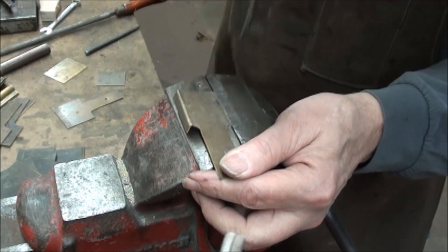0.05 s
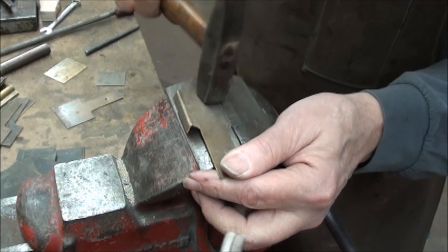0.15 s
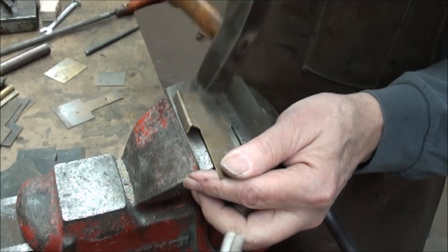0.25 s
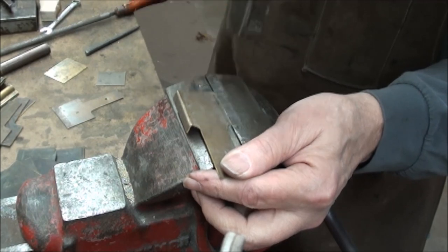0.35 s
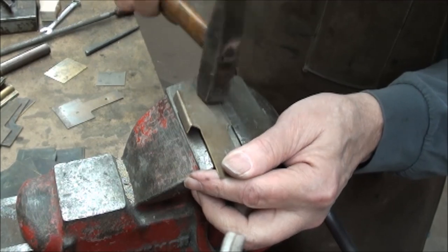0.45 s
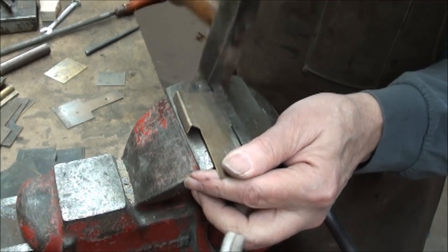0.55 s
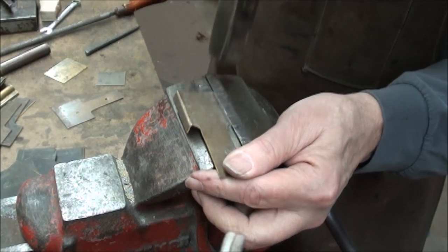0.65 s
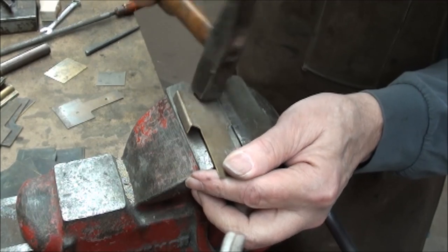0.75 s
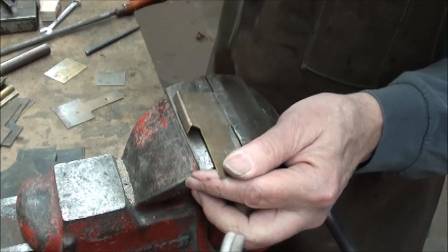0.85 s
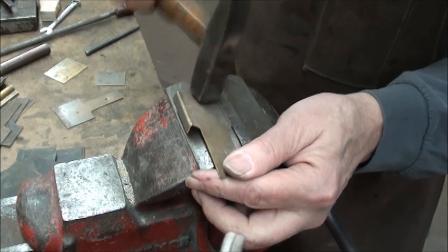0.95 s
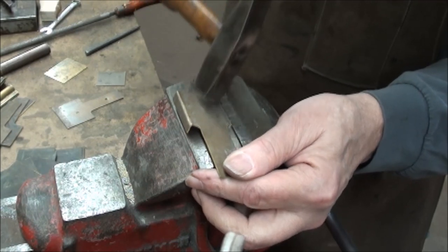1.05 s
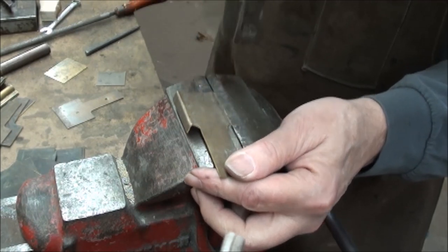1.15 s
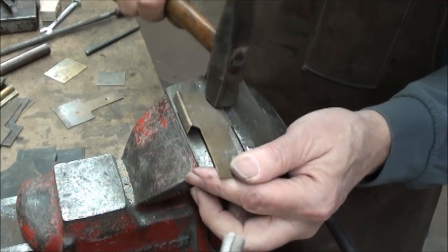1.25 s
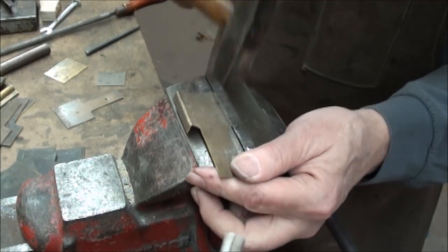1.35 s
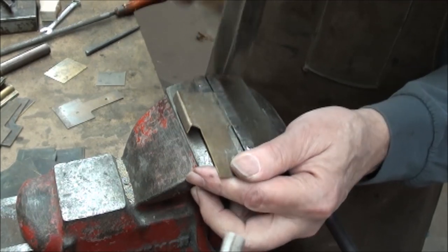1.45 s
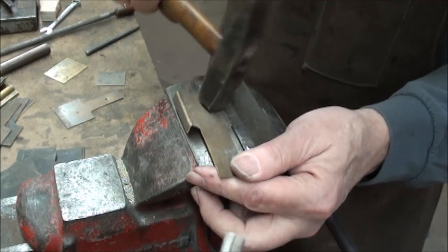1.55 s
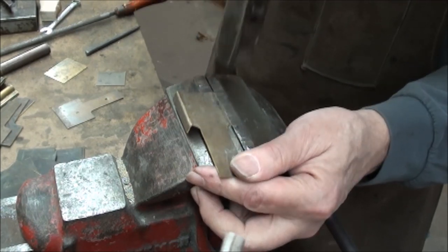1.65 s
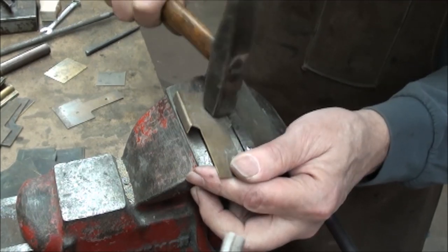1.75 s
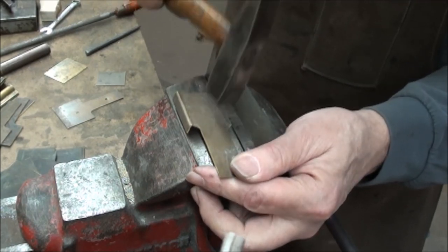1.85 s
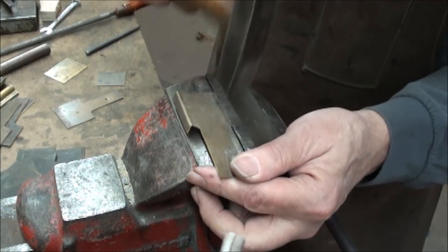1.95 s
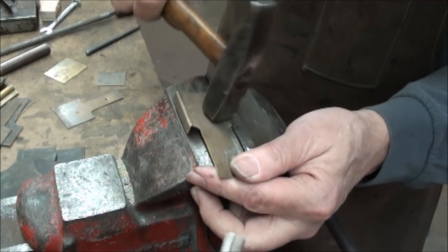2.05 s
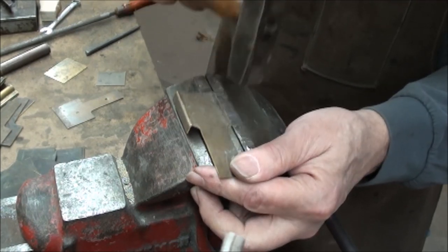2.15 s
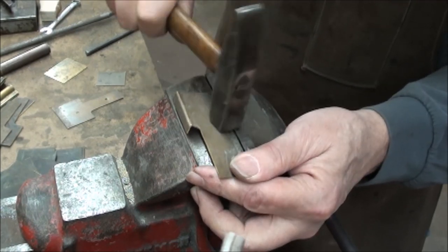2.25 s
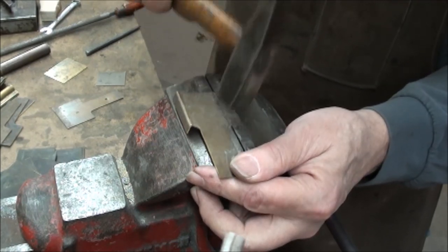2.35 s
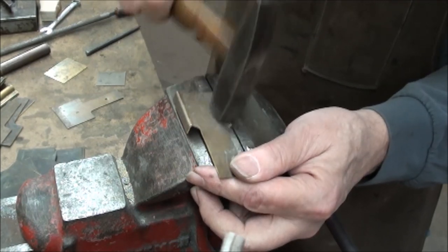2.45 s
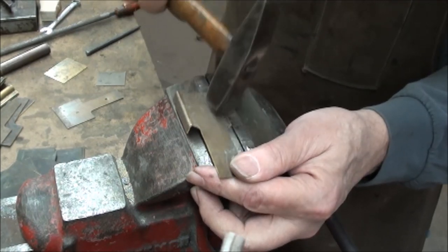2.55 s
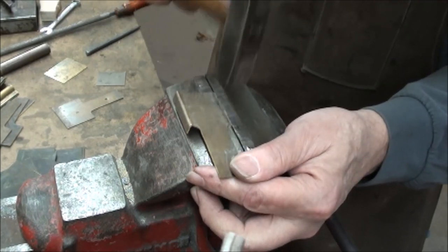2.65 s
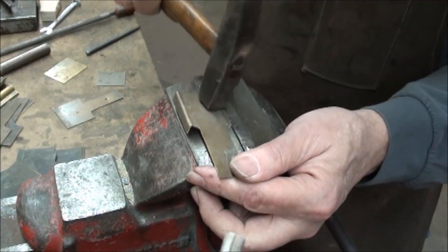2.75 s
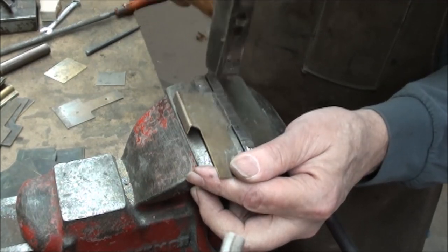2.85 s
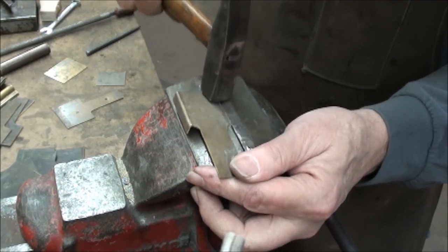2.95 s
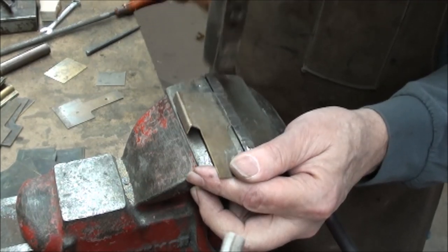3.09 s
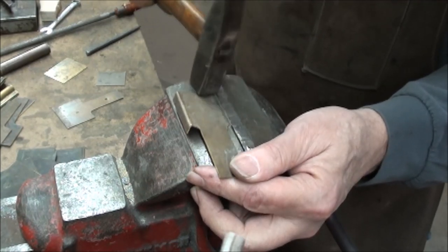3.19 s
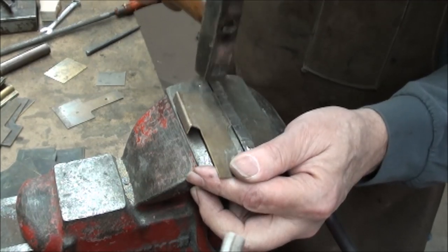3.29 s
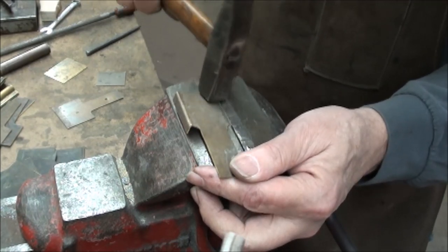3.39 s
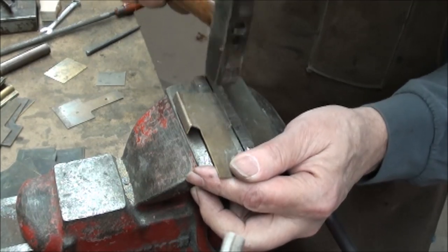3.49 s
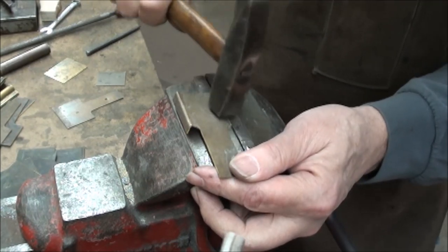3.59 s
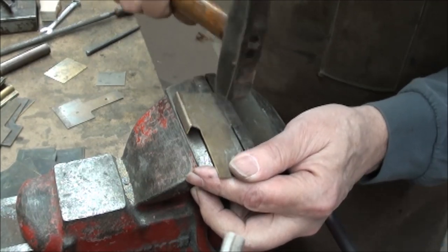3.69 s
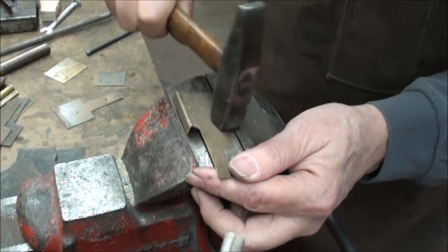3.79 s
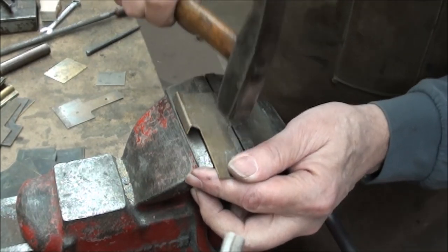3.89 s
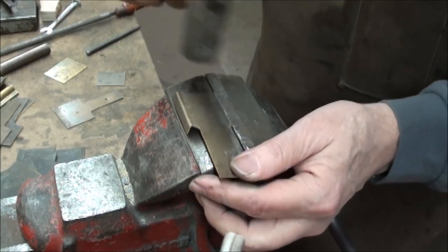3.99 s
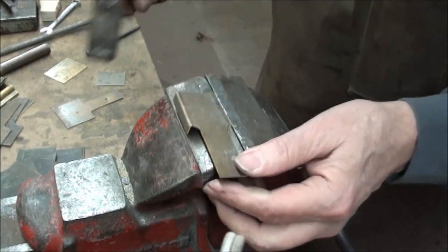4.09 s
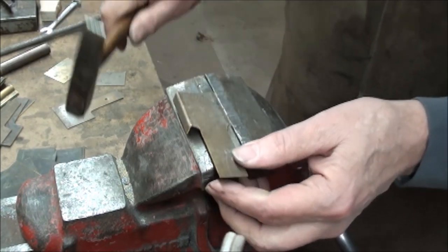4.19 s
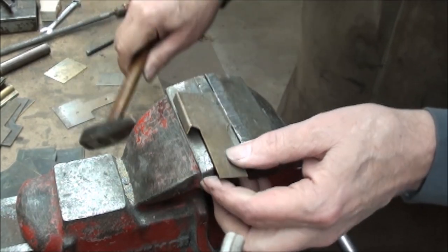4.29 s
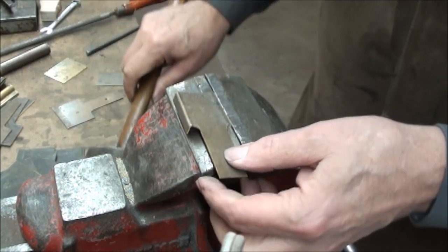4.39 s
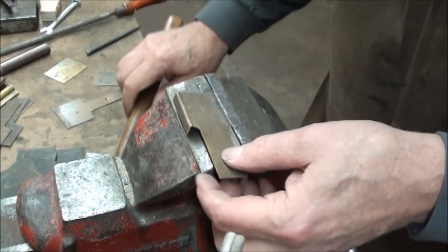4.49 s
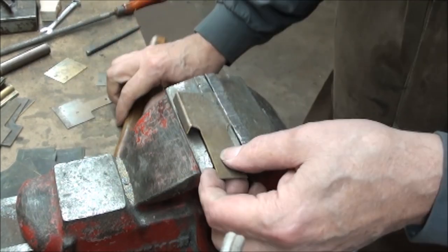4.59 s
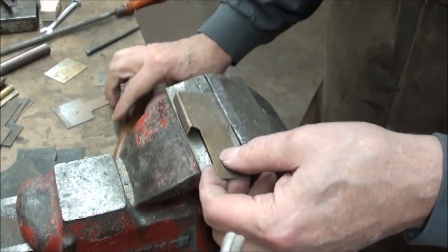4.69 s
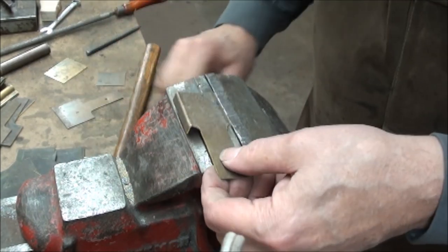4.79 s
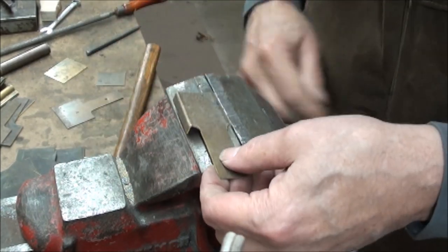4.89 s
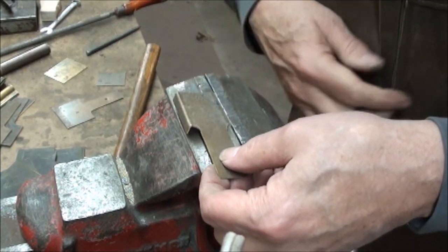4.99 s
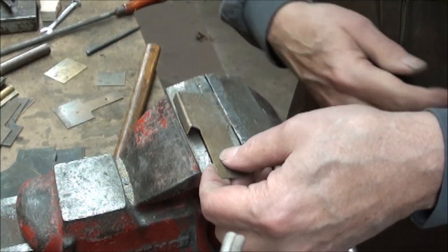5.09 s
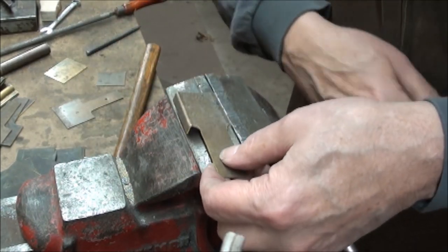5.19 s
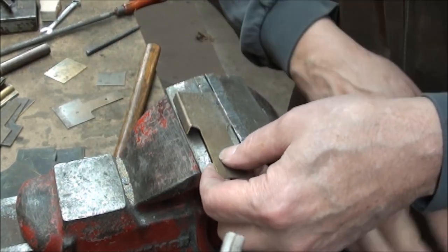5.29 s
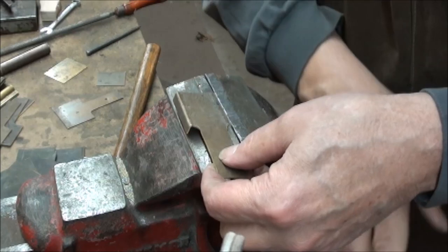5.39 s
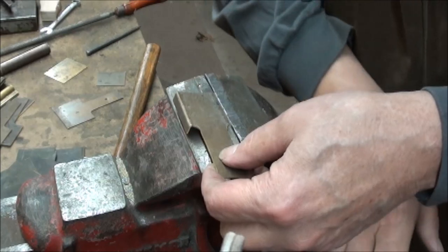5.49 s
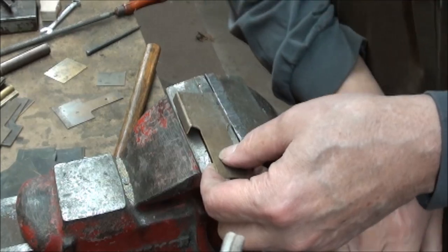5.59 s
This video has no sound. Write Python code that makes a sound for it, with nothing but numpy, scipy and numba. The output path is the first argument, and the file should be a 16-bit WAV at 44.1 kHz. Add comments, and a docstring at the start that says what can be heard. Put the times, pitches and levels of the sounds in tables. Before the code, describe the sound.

Close up in a small workshop, a hammer beats thin sheet metal on a steel vise, about four blows a second and slightly quickening, each a hard bright clank with a short ring and bench thud. The blows stop; the hammer is knocked down on the bench, loose metal scraps jingle, and cloth rustles softly over quiet room tone.

```python
"""A hammer beats a strip of sheet metal flat on a bench vise in a small workshop, over steady room tone.
Each blow sums damped steel modes, a bench thud and scattered noise; most bring bright slaps of the strip.
The lifted head then sings faintly as wavering sines until the hand stills it. Laid on the bench, it knocks
the top while loose offcuts jingle as bursts of noise; a sleeve rustles as slowly modulated noise.
The microphone is close, and its fast limiter flattens the start of every blow."""
import sys
import numpy as np
from scipy import signal
from scipy.fft import rfft, irfft, next_fast_len
from scipy.io import wavfile
from scipy.ndimage import minimum_filter1d, map_coordinates
from numba import njit

SR = 44100
rng = np.random.default_rng(int(sys.argv[2]) if len(sys.argv) > 2 else 0)


def digitize_waveform(pressure):
    """Quantize a signal to 16-bit integers and store it at the path in sys.argv[1].

    Rows of a 2-D input are taken as channels; values are limited to [-1, 1].
    """
    field = np.atleast_2d(pressure).T
    bounded = np.clip(field, -1, 1)
    quanta = np.round(bounded * 32767).astype(np.int16)
    wavfile.write(sys.argv[1], SR, quanta)


N = 248724

# hammer blows: (time [s], clatter level [dB], bench thud level [dB], treble lift reached at 8 kHz [dB],
# then ring levels of vise body, strip, vise jaw, hammer head [dB])
BLOWS = [(-0.02, -9.5, -15.5, 7, -25, -22.5, -41, -22), (0.2423, -10, -15.5, 7.5, -22.5, -36, -26, -23),
         (0.516, -10, -15, 4, -23.5, -22, -21, -23), (0.79, -14, -16.5, 0.5, -25, -26, -25, -26.5),
         (1.0584, -13, -19.5, 10, -24, -25, -23, -17), (1.3189, -10.5, -17, 1.5, -17, -12, -24, -19.5),
         (1.5867, -10.5, -18, 2.5, -25, -16.5, -22.5, -22),
         (1.8391, -13, -21, -.5, -19.5, -16.5, -24.5, -18.5), (2.085, -13, -19.5, 3, -23, -21.5, -14, -17),
         (2.3341, -8.5, -23, 3, -11.5, -38, -28, -21), (2.5649, -12, -22.5, -1, -17, -28, -16.5, -16),
         (2.788, -13.5, -21.5, 1.5, -20.5, -18, -16.5, -20), (3.0043, -14, -22, 0, -27, -19, -17, -37),
         (3.2245, -17, -21.5, 1.5, -27.5, -31.5, -25, -28),
         (3.4321, -16, -23, -1.5, -25.5, -25, -15.5, -23.5),
         (3.6405, -14, -22, -1, -23.5, -23, -19.5, -19.5), (3.8465, -17, -22, 5, -25.5, -27, -19, -21.5)]
# modes of vise, strip and hammer head, one column each: (frequency [Hz]), (level over its part's ring [dB]),
# (t60 [s]), (part that carries it: 0 vise body, 1 strip, 2 vise jaw, 3 hammer head)
STEEL_HZ = [937, 1347, 1960, 2012, 2165, 2337, 2372, 2420, 2871, 3061, 3826, 3876, 3945, 4118, 5386, 5420,
            5696, 5750, 6700, 7176, 7241, 7380, 8625, 9010, 9776, 11080, 12230]
STEEL_DB = [-17, -24, -10, -11, -12, -7, -3.5, -14.5, -13.5, -9, -4.5, -3.5, -8.5, -12.5, -2.5, -2.7, -15.5,
            -16, -8.5, -3, -31, -5, -16, -5.5, -6, -10, -13.5]
STEEL_T60 = [0.536, 1.4, 0.354, 0.32, 0.342, 0.356, 0.418, 0.163, 0.357, 0.348, 0.302, 0.248, 0.21, 0.325,
             0.288, 0.302, 0.394, 0.34, 0.303, 0.193, 1.14, 0.121, 0.156, 0.2, 0.201, 0.145, 0.19]
STEEL_PART = [0, 0, 3, 3, 3, 1, 1, 2, 2, 0, 2, 2, 3, 0, 3, 1, 0, 0, 3, 3, 3, 3, 3, 0, 3, 2, 1]
# bench modes: (frequency [Hz], level over the thud [dB], t60 [s])
BENCH_MODES = [(250, -21, .28), (385, -6, .33), (475, -14, .3), (594, -17, .28), (745, -16, .28)]
# floor modes under the bench: (frequency [Hz], level over the boom [dB], t60 [s])
FLOOR_MODES = [(69.9, -1, 0.62), (110.8, 0, 0.46), (167.5, 0.5, 0.44)]
# clatter of the strip: (frequency [Hz], level per Hz [dB])
CLATTER_SPECTRUM = [(100, -10), (300, -10.5), (700, -7.5), (1500, 0.5), (2300, 3.5), (3300, 2), (3900, 1),
                    (4800, -5), (5400, 4), (6200, -2), (7300, 0), (10000, -3.5), (13000, -9.5),
                    (16000, -25.5)]
# dull noise of the bench thud: (frequency [Hz], level per Hz [dB])
THUD_SPECTRUM = [(50, -72), (110, -18.5), (250, -5), (400, 2), (700, -2.5), (1100, -7), (2000, -12),
                 (6000, -82)]
# contact of steel face on steel: (frequency [Hz], level per Hz [dB])
STRIKE_SPECTRUM = [(1000, -51), (4000, -48), (7500, 20), (11500, 5), (14500, 1), (16500, -35)]
# the strip slaps back on the jaw: (time [s], level [dB], frequency [Hz])
SLAPS = [(0.26, -4.5, 8650), (0.534, 2.5, 7200), (0.8044, 5.5, 9060), (0.832, -6, 7900), (1.078, 7, 7100),
         (1.34, -6.5, 7150), (1.856, -6, 12100), (2.102, -17, 10000), (2.5903, -5, 7400), (3.242, -8, 7000),
         (3.4589, -12, 7000), (3.6716, -10.5, 6770), (3.8692, -3.5, 7660)]
# hammer laid down: (time [s], level [dB], offcut tick over it [dB], handle over it [dB])
KNOCKS = [(4.5, -17, -25.5, -24), (4.556, -11, -26, -13.5), (4.725, -13, -44, -10.5)]
# bench-top modes under a knock: (frequency [Hz], level over the knock [dB], t60 [s])
BOARD_MODES = [(370, -23, 0.077), (614, 4.5, 0.027), (760, -1, 0.042), (895, -17, 0.049)]
# bench top as the walls return it: (frequency [Hz], level per Hz [dB])
PLANK_SPECTRUM = [(120, -38), (280, 0.5), (600, 6.5), (900, 0.5), (1400, -18), (3000, -48), (8000, -78)]
# hammer handle on the bench: (frequency [Hz], level per Hz [dB])
HANDLE_SPECTRUM = [(600, -18.5), (1150, -2.5), (1700, -1.5), (2200, -3.5), (2800, -8.5), (4500, -18),
                   (9000, -24), (16000, -77)]
# offcuts tumbling: (time [s], level [dB], t60 of the crack [s])
JINGLE = [(4.61, -21.5, 0.062), (4.644, -27.5, 0.066), (4.65, -19, 0.033), (4.688, -27.5, 0.027),
          (4.711, -33.5, 0.073)]
# offcuts, also the click of a slap: (frequency [Hz], level per Hz [dB])
OFFCUT_SPECTRUM = [(1470, -11), (2500, -13), (3660, -12.5), (4240, -7), (5690, -8.5), (7250, -1.5),
                   (9580, -2.5), (10300, -9.5), (16000, -23)]
# the ringing head passes the microphone: (time [s], level [dB])
SWING_LEVEL = [(4.0, -90), (4.12, -57), (4.2, -60), (4.26, -73), (4.3, -50.5), (4.32, -60), (4.35, -88)]
# tones of the lifted head: (frequency [Hz], relative level [dB])
HEAD_TONES = [(3830, -6), (5390, -2), (6490, -3), (7241, 8), (8640, -3), (9780, 1.5), (10800, -7)]
# sleeve rustle: (time [s], level [dB])
SLEEVE_LEVEL = [(4.5, -72), (4.9, -58), (4.97, -62), (4.99, -50.5), (5.06, -45.5), (5.13, -59), (5.27, -54),
                (5.45, -56.5), (5.57, -54.5), (5.64, -58)]
# cloth of the sleeve: (frequency [Hz], level per Hz [dB])
CLOTH_SPECTRUM = [(88, -51), (150, -36), (286, -1.5), (494, -7), (578, -6.5), (1660, -8), (2140, -8.5),
                  (2600, -11), (7920, -10), (16000, -32)]
# room tone: (frequency [Hz], level per Hz [dB])
AIR_SPECTRUM = [(18, -30), (40, -10), (100, -9), (180, -4), (330, 0), (420, -8), (2750, -17), (7300, -15),
                (10000, -20), (13000, -24), (16000, -29)]
# decay of the workshop: (frequency [Hz], t60 [s])
SHOP_T60 = [(60, 0.55), (300, 0.35), (1500, 0.39), (4000, 0.32), (8000, 0.28), (14000, 0.16)]
# stereo width: (frequency [Hz], side over mid [dB])
WIDTH = [(60, -72), (150, -43), (380, -26.5), (950, -10.5), (2380, -13), (5980, -9.5), (15000, -28)]
# the vise sits a little left: (frequency [Hz], left up and right down [dB])
LEAN = [(200, 0), (1000, .25), (4000, .5), (10000, .35)]

THUD_MEAN_DB, BOOM_DB = -19.5, -39  # a usual thud, and the floor's boom under it
BOOM_GROWS = 1.04  # dB of boom per dB of thud
STRIKE_DB = -1.5  # bright contact, over clatter plus treble lift
REBOUND_S, REBOUND_LOSS_DB, REBOUND_HZ = .012, 9.5, 7630  # usual gap, loss per rebound, usual pitch
AIR_DB = -59.5  # middle signal of the room tone
ONSET_DELAY_S = .001  # every blow and knock sets in this much after its listed time
LEAD = SR // 10  # samples kept ahead of time zero, for a blow already under way
TOP_HZ = 16300  # upper limit of the microphone chain


def hammer():
    """Impact excitation: each blow rings the steel modes, thuds the bench and clatters the strip."""
    out, t = np.zeros((2, N + LEAD)), np.arange(SR // 2) / SR
    fade = np.clip((t[-1] - t) / 0.014, 0, 1)
    swell = 1 - np.exp(-t / 0.0073)  # the heavy bench takes a moment to move
    for s, clatter_db, thud_db, treble_db, *part_db in BLOWS:
        # no two blows land quite alike
        mode_db = np.take(part_db, STEEL_PART) + rng.normal(0, 2, len(STEEL_PART))
        steel_modes = np.transpose([STEEL_HZ, STEEL_DB + mode_db, STEEL_T60])
        steel = ring(steel_modes, t, flutter=1.82, turns=37.1)

        boom_db = BOOM_DB + BOOM_GROWS * (thud_db - THUD_MEAN_DB)
        floor = [(hz, db + boom_db, t60) for hz, db, t60 in FLOOR_MODES]
        bench = [(hz, db + thud_db, t60) for hz, db, t60 in BENCH_MODES]
        wood = swell * ring(floor + bench, t, flutter=0.87, turns=15.1)
        mid, side = steel + wood

        # the lift grows from 4 to 8 kHz, then stays
        colour = [(hz, db + treble_db * np.clip(np.log2(hz / 4000), 0, 1)) for hz, db in CLATTER_SPECTRUM]
        clatter = amp(clatter_db) * clang(colour, len(t), crack_db=-80.0, crack_s=0.0049, side_db=0.5)
        thud = clang(THUD_SPECTRUM, len(t), crack_db=-10, crack_s=0.046, side_db=-4)
        thud = amp(thud_db) * swell * thud
        strike_db = clatter_db + treble_db + STRIKE_DB - 60 * t / 0.013
        strike = amp(strike_db) * noise(STRIKE_SPECTRUM, len(t))
        add(out, s, fade * (wide(mid, amp(3) * side) + clatter + thud + strike))
    return out[:, LEAD:]


def rattle():
    """Repeated impact with energy loss: each slap and its two rebounds click and ring for a few ms."""
    direct, t = np.zeros(N + SR), np.arange(SR // 40) / SR
    chance = rng.standard_normal((len(SLAPS), 2, 3))
    rebounds = []
    for (s, db, _), rows in zip(SLAPS, chance):
        for count, (late, louder, higher) in enumerate(rows, start=1):
            rebound_s = s + REBOUND_S * (count + 0.25 * late)
            rebound_db = db - REBOUND_LOSS_DB * count + 3 * louder
            rebounds.append((rebound_s, rebound_db, REBOUND_HZ * np.exp(0.064 * higher)))
    for s, db, hz in SLAPS + rebounds:
        tone = amp(-60 * t / 0.015) * np.sin(2 * np.pi * hz * t)
        click = .5 * amp(-60 * t / 0.001) * noise(OFFCUT_SPECTRUM, len(t))
        direct[round(s * SR):][:len(t)] += amp(db) * (tone + click)
    return shop(direct[:N], wet_db=-25.5, side_db=-7)


def laid_down():
    """Light impact on a plate: head and handle knock the bench top; offcuts tick and jingle as noise."""
    out, t = np.zeros((2, N + LEAD)), np.arange(SR // 2) / SR
    for s, db, tick_db, handle_db in KNOCKS:
        board = ring(BOARD_MODES, t, flutter=.3, turns=5.5)[0] * np.minimum(t / 0.0026, 1)
        plank = clang(PLANK_SPECTRUM, len(t), crack_db=-19, crack_s=0.031, side_db=-1)
        board = board + amp(-11.5) * plank
        handle = clang(HANDLE_SPECTRUM, len(t), crack_db=9.5, crack_s=0.032, side_db=-1.0)
        tick = clang(OFFCUT_SPECTRUM, len(t), crack_db=19, crack_s=0.067, side_db=12)
        tick = np.minimum(t / 0.0064, 1) * tick
        add(out, s, amp(db) * (board + amp(handle_db) * handle + amp(tick_db) * tick))
    for s, db, t60 in JINGLE:
        rise = np.minimum(t / 0.003, 1)
        add(out, s, amp(db) * rise * clang(OFFCUT_SPECTRUM, len(t), crack_db=5.5, crack_s=t60, side_db=1.0))
    high_pass = signal.butter(2, 130, "high", fs=SR, output="sos")  # nothing below about 130 Hz from the knocks and jingle
    return signal.sosfilt(high_pass, out[:, LEAD:])


def swing():
    """Amplitude modulation: each tone of the lifted head wavers as it turns, until the hand stills it."""
    t = np.arange(N) / SR
    tones = np.zeros(N)
    for hz, db in HEAD_TONES:
        waver_db = 6 * map_coordinates(rng.standard_normal(500), [np.linspace(0, 499, N)], order=1)
        tones += amp(db) * amp(waver_db) * np.sin(2 * np.pi * hz * t)
    return level(SWING_LEVEL + [(4.4, -120)]) * unit(tones)


def quiet():
    """Broadband noise: steady room tone, and friction of a sleeve whose level wavers with its folds."""
    air = amp(AIR_DB) * wide(noise(AIR_SPECTRUM, N), amp(7.0) * noise(AIR_SPECTRUM, N))
    folds = amp(0.89 * map_coordinates(rng.standard_normal(300), [np.linspace(0, 299, N)]))
    cloth = wide(noise(CLOTH_SPECTRUM, N), amp(-1) * noise(CLOTH_SPECTRUM, N))
    return air + level(SLEEVE_LEVEL) * folds * cloth


def ring(modes, t, flutter, turns):
    """Modal decay: damped mid and side modes; reflections flutter each turns times per t60, long ones less."""
    hz, db, t60 = np.transpose(modes)[:, :, None]
    size = (2, len(hz), 200)
    knots = rng.standard_normal(size) + 1j * rng.standard_normal(size)
    slow = t[::16]  # envelopes need only every 16th sample
    at = np.minimum(slow * turns / t60, 198)
    whole, mode = at.astype(int), np.arange(len(hz))[:, None]
    part = at - whole
    drift = knots[:, mode, whole] * (1 - part) + knots[:, mode, whole + 1] * part
    depth = np.minimum(slow / 0.002, 1) * np.minimum(0.4 / t60, 1) ** 2
    # the middle is a steady mode plus flutter, the side is flutter alone
    waver = [[[1]], [[0]]] + drift * [[[flutter]], [[1]]] * depth
    shape = (waver * amp(db - 60 * slow / t60)).repeat(16, axis=2)[..., :len(t)]
    carrier = np.exp(2j * np.pi * (hz * t + rng.random(hz.shape)))
    return np.einsum("cmt,mt->ct", shape, carrier).imag


def clang(spectrum, size, crack_db, crack_s, side_db):
    """Diffuse reflection: a short crack of noise, and that noise scattered by the walls, dying at their speed."""
    mid, side = decayed([noise(spectrum, size), noise(spectrum, size)])[:, :size]
    crack = amp(crack_db - 60 * np.arange(size) / SR / crack_s)
    return wide(mid * (1 + crack), amp(side_db) * side)


def shop(x, wet_db, side_db):
    """Reverberation: a sound convolved with a noise tail that dies at its own speed at each frequency."""
    tail = decayed(rng.standard_normal((2, SR * 2 // 3)))
    tail = tail / np.linalg.norm(tail[0])
    tail = np.pad(tail, ((0, 0), (round(0.00067 * SR), 0)))  # s until the first reflection
    wet = signal.fftconvolve(x[None], tail, axes=1)[:, :len(x)]
    mid, side = wet * amp([[wet_db], [side_db]])
    return wide(x + mid, side)


def decayed(x):
    """Frequency-dependent absorption: each band of x falls 60 dB in the workshop's t60."""
    hz, t, bands = signal.stft(x, SR, nperseg=256)
    fall = amp(-60 * t / along(SHOP_T60, hz)[:, None])
    return signal.istft(bands * fall, SR, nperseg=256)[1]


def wide(mid, side):
    """Mid-side stereo: left and right are the sum and difference of a middle and a filtered side."""
    side = filtered(side, lambda hz: amp(along(WIDTH, hz)))
    return np.array([mid + side, mid - side])


def noise(spectrum, size):
    """Spectral shaping: white noise coloured by a spectrum, of rms 1."""
    return unit(filtered(rng.standard_normal(size), lambda hz: amp(along(spectrum, hz))))


def filtered(x, response):
    """Linear filtering: the spectrum of x times a response of frequency."""
    m = next_fast_len(x.shape[-1] + 4096)
    return irfft(rfft(x, m) * response(np.fft.rfftfreq(m, 1 / SR)), m)[..., :x.shape[-1]]


def add(out, s, x):
    """Superposition: mixes x in at s seconds plus a short delay; out starts LEAD samples early."""
    part = out[:, LEAD + round((s + ONSET_DELAY_S) * SR):][:, :x.shape[1]]
    part += x[:, :part.shape[1]]


def level(rows):
    """Level envelope: gain per sample from (time [s], level [dB]) rows, at -120 dB before the first."""
    s, db = np.transpose(rows)
    return amp(np.interp(np.arange(N) / SR, s, db, left=-120))


def along(points, hz):
    """Logarithmic frequency scale: interpolates (frequency [Hz], value) points."""
    f, v = np.transpose(points)
    return np.interp(np.log(hz + 1), np.log(f + 1), v)


def amp(db):
    """Decibel law: 20 dB is a factor of ten in amplitude."""
    return 10 ** (np.asarray(db) / 20)


def unit(x):
    """Root-mean-square normalisation: x scaled to rms 1."""
    return x / np.sqrt(np.mean(x ** 2) + 1e-20)


def scene():
    """Superposition of all sources, then a level difference between the ears' sides leaning left."""
    sound = hammer() + rattle() + swing() + laid_down() + quiet()
    return filtered(sound, lambda hz: amp(np.outer([1, -1], along(LEAN, hz))))


@njit
def follow(over, rise, fall):
    """Exponential smoothing: gain reduction in dB that grips faster than it lets go."""
    cut, held = np.zeros_like(over), over[0]
    for i in range(len(over)):
        held += (over[i] - held) * (rise if over[i] > held else fall)
        cut[i] = held
    return cut


def record(dry):
    """Peak limiting: the microphone drops deep bass, a limiter follows peaks, the preamp rounds the rest."""
    dry = signal.sosfilt(signal.butter(3, 55, "high", fs=SR, output="sos"), dry)
    peak = -minimum_filter1d(-np.abs(dry).max(0), size=45, origin=14)  # running maximum, mostly of the past
    over_db = np.maximum(20 * np.log10(peak + 1e-9) + 11, 0)  # threshold -11 dB
    cut_db = follow(over_db, 1 / (0.00082 * SR), 1 / (0.0012 * SR))  # time constants in s
    held = dry * amp(-cut_db)
    held = held / (1 + np.abs(held / .5) ** 4) ** (1 / 4)  # soft clipping towards 0.5
    return filtered(held, lambda hz: hz < TOP_HZ)


dry = scene()
out = record(dry)
digitize_waveform(out)
```